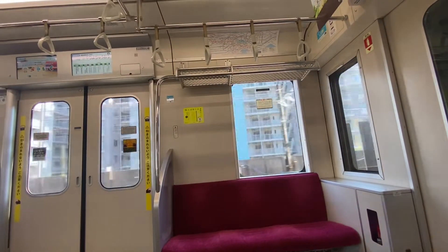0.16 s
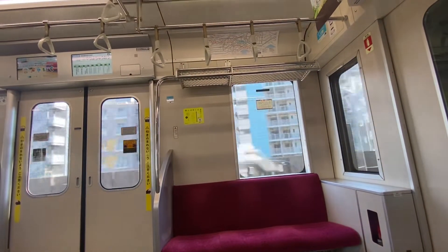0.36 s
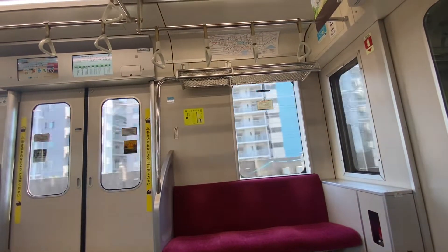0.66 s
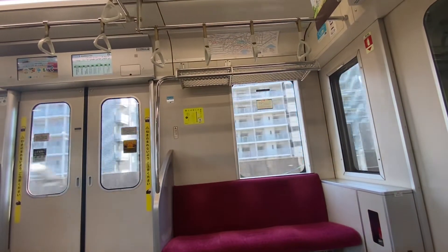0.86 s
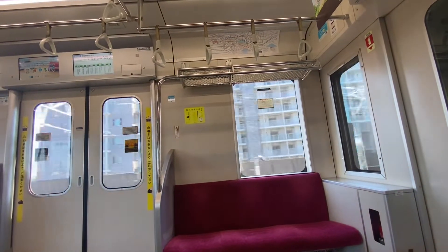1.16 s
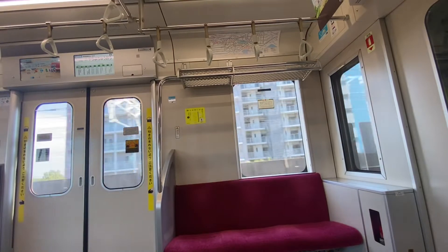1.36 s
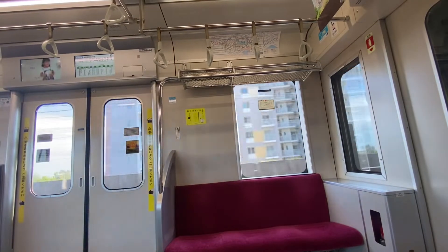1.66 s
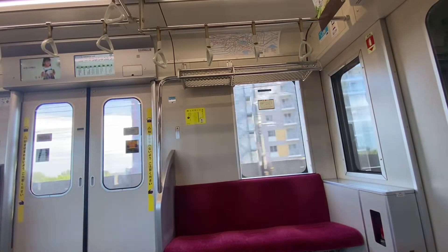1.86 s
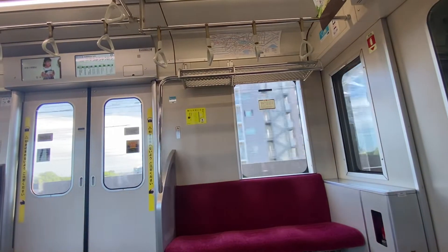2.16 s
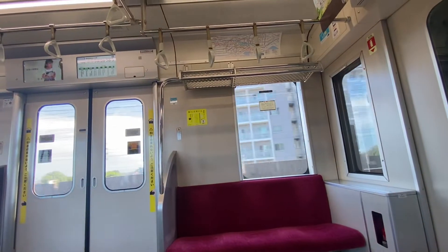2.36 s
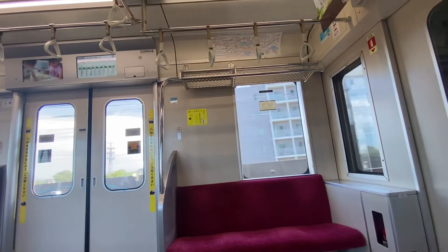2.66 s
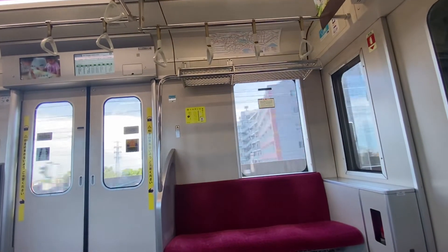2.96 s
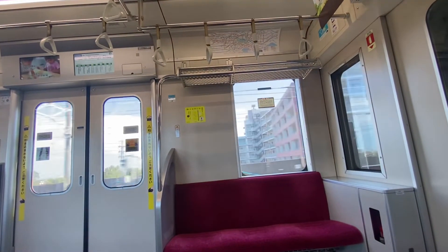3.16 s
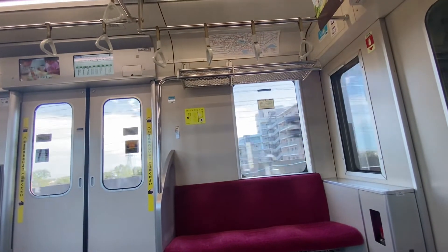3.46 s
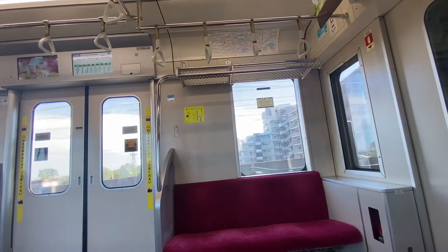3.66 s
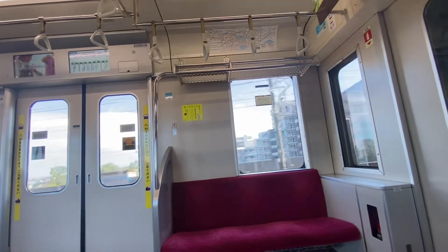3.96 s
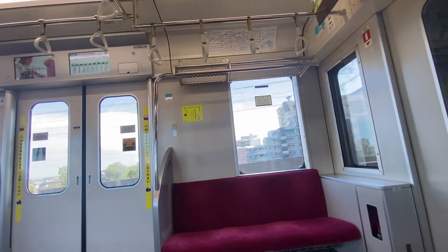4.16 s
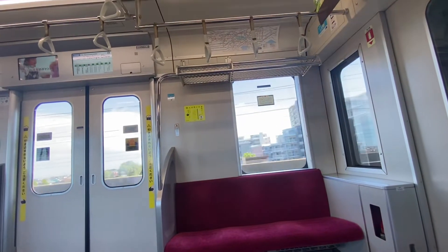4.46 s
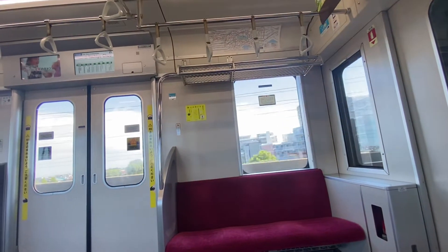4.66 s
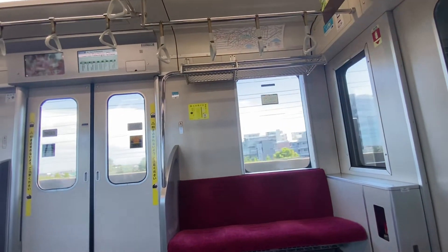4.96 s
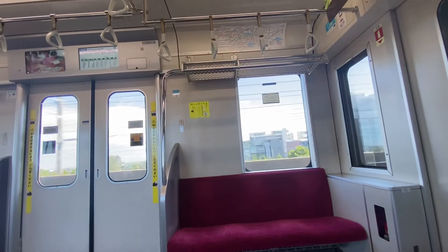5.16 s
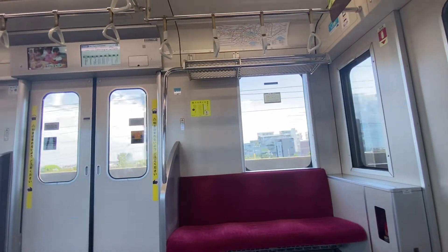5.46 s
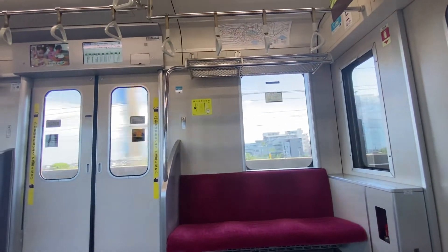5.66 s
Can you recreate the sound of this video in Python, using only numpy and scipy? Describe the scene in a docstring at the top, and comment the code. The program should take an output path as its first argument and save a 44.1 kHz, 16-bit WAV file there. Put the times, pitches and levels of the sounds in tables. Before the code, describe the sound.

Inside an electric train carriage, already moving and gathering speed for nearly six seconds. A gear and motor whine runs throughout, its main tone gliding from about 675 to 750 Hz, with a strong octave overtone, fainter higher ones and a low hum near 200 Hz. It wavers, beats and rasps in fits, roughest at the very start, and differs between left and right. Below, floor rumble and hollow drone swell and sink, thinning around 2.2 to 2.8 s and returning fuller after 4.4 s; a broad rolling roar grows slightly from 3 s. Dull rail-joint knocks, with short cabin reverberation and ringing panels, fall at 0.2 s, weakly at 1.4, then 1.9, 2.4, 2.8, strongly at 2.9, 3.3, 3.8 and 4.3, and faintly at 4.95 s. The whine is still climbing at the end.

```python
"""The gears of an electric train gathering speed whine inside its carriage: a mesh tone rises slowly, with
overtones, rasp and shaft sidebands, all locked to one shaft angle and shaped by resonances.
Floor rumble, drone and rolling roar are noise in third-octave bands that swell and sink.
Dull knocks from the joints are decaying noise bursts, and set damped sines ringing in floor and panels."""
import sys
import numpy as np
from scipy import signal
from scipy.io import wavfile

SR = 44100
rng = np.random.default_rng(int(sys.argv[2]) if len(sys.argv) > 2 else 0)


def boost(x):
    """Linear amplitude factor 10**(x/20) for a level x in decibels (scalar or array-like)."""
    u = np.asarray(x, float) / 20
    return 10 ** u


def put_to_file(sound):
    """Save the sound as 16-bit audio at rate SR, in the file named by the first command-line argument."""
    columns = np.atleast_2d(sound).T  # one column per channel
    safe = np.clip(columns, -1, 1)
    whole_steps = np.round(safe * 32767)
    wavfile.write(sys.argv[1], SR, whole_steps.astype(np.int16))


N = 255780

# Blows from the joints. Each row: start in seconds, nominal level in dB at 1800 to 3200 Hz,
# rise in dB below 900 Hz, rise in dB at 6000 Hz.
KNOCK_TIMES = [(0.1888, -41.5, 10.5, -15), (1.401, -49.5, 16.5, 1), (1.9291, -39.5, 4, -9.5),
               (2.4083, -38, 7.5, 5.5), (2.7989, -43, 9, -10), (2.9188, -34.5, 7.5, -4.5),
               (3.327, -34.5, 6, 3), (3.8322, -35, 9, -5.5), (4.2726, -35.5, 8, 1.5),
               (4.9572, -46.5, 8.5, -14)]


def rms_one(x):
    """Normalisation: the mean square is the power, so dividing by its root gives unit rms."""
    return x / np.sqrt(np.mean(np.abs(x) ** 2) + 1e-20)


def in_time(rows):
    """Linear interpolation: the columns of a time table become one value a sample."""
    s, *columns = np.transpose(rows)
    return [np.interp(np.arange(N) / SR, s, c) for c in columns]


def at_hz(points, hz):
    """Log-frequency interpolation: equal musical intervals are equal distances along a spectrum."""
    table = np.array(points)
    return np.interp(np.log(hz), np.log(table[:, 0]), table[:, 1])


def drift(rate_hz, channels=1):
    """Low-pass filtered chance: two equal poles leave a slow random curve of unit rms."""
    step, settle = 20, 4000  # computed at every 20th sample, after the filter has settled
    r = np.exp(-2 * np.pi * rate_hz * step / SR)
    white = rng.standard_normal((channels, N // step + settle + 2))
    slow = signal.lfilter([1], [1, -2 * r, r * r], white)[:, settle:]
    return np.array([np.interp(np.arange(N) / step, np.arange(len(s)), rms_one(s)) for s in slow])


def blur(width_hz):
    """Random modulation: complex noise for two sides spreads a carrier line into a band."""
    parts = drift(width_hz, channels=4)
    return (parts[:2] + 1j * parts[2:]) / np.sqrt(2)


def standing(hz):
    """Modal response: height and phase of a tone at each side sum the standing waves near its pitch."""
    # Standing waves of the carriage. Each row: frequency in Hz, width in Hz,
    # signed height at the left, signed height at the right.
    modes = [(682.97, 6.4, 0.1, -0.188), (686.15, 8.35, -0.155, -0.21), (688.74, 29.03, 0.12, 0.25),
             (693.19, 4.1, 0.069, -0.129), (695.09, 9.76, -0.204, -0.126), (700.74, 3.3, 0.025, -0.003),
             (703.2, 1.0, 0.028, 0.032), (703.53, 4.77, 0.022, -0.101), (709.92, 3.95, 0.052, -0.038),
             (711.48, 15.51, -0.08, -0.12), (713.56, 3.98, 0.024, -0.052), (718.59, 3.16, 0.05, -0.056),
             (722.64, 6.02, -0.081, -0.234), (723.84, 28.87, -0.047, 0.25), (729.0, 3.25, 0.061, -0.03),
             (732.95, 3.22, 0.083, -0.009), (735.45, 1.21, 0.016, 0.064), (738.2, 1.28, 0.004, 0.062),
             (740.6, 3.24, 0.017, 0.15), (741.67, 11.53, 0.031, -0.219), (743.93, 1.84, 0.021, -0.092),
             (744.39, 4.53, -0.008, 0.216), (746.01, 2.56, -0.018, -0.094), (749.86, 1.0, -0.007, -0.05),
             (815.55, 15.59, -0.052, 0.068)]
    centre, width, *sides = np.transpose(modes)
    detuning = 2 * (hz[::100] - centre[:, None]) / width[:, None]
    coarse = np.array(sides) @ (1 / (1 + 1j * detuning))
    return np.repeat(coarse, 100, axis=1)[:, :N]


def lifted(hz):
    """Resonance: the height of a gear line is the root of the powers of the resonances near its pitch."""
    # Each row: resonance frequency in Hz, width in Hz, height in dB.
    resonances = [(198.8, 5, -35), (204, 4, -46), (213.5, 3, -46), (657, 9, -36), (700, 60, -45.5),
                  (1351, 7, -41), (1359, 3, -41), (1367.5, 5, -39), (1375.5, 7, -35), (1384, 5, -38),
                  (1390, 4, -41), (1397, 5, -37), (1404, 7, -36.5), (1414, 8, -43), (1422, 4, -41),
                  (1430.5, 6, -38), (1443, 5, -38), (1449.5, 5, -36), (1457, 5, -36.5), (1463, 6, -37),
                  (1472, 5, -39.5), (1480, 7, -42), (1495, 6, -45), (2049, 8, -53), (2063, 8, -52),
                  (2078, 12, -51), (2095, 8, -54), (2113, 12, -53), (2138, 14, -48), (2158, 12, -47.5),
                  (2187, 30, -52), (2238, 40, -55), (2722, 20, -52), (2745, 40, -55), (2775, 26, -49.5),
                  (2801, 16, -46.5), (2850, 36, -52.5), (2905, 36, -54), (2961, 22, -45), (2988, 14, -48),
                  (3005, 14, -53), (3580, 160, -58), (6720, 280, -77), (7250, 600, -90)]
    centre, width, level_db = np.transpose(resonances)
    detuning = 2 * (hz[::100] - centre[:, None]) / width[:, None]
    power = boost(2 * level_db) @ (1 + detuning ** 2) ** -2.0
    return np.repeat(np.sqrt(power), 100)[:N]


def gears(rasp_db):
    """Gear meshing: tooth contacts lock tone, overtones and sidebands to one shaft angle; uneven teeth rasp."""
    # Train speed as gear mesh rate. Each row: time in seconds, mesh rate in Hz.
    speed = [(0.0, 675.1), (1.0, 689.1), (2.0, 702.3), (3.0, 715.1), (4.0, 727.8), (5.0, 740.7),
             (5.8, 751.3)]
    # Further gear lines, as multiples of the mesh rate.
    multiples = [2, 3, 4, .291, 9.87, 5]
    # One row for each multiple: left over right in dB, blur in dB relative to the line, blur width in Hz.
    orders = [(0, -3, 45), (1.5, -3, 50), (3.5, -3, 55), (-0.5, -8, 9), (6, -15, 30), (5, 0, 50)]
    # Phase by which the left side leads a gear line. Each row: line frequency in Hz, lead in radians.
    leads = [(200, -.4), (1350, -2.3), (1376, -2.6), (1392, -1.6), (1402, -.5), (1412, -2.6), (1422, -2.5),
             (1429, -.9), (1438, -1), (1442, -2.6), (1450, -1), (1464, -.2), (1474, -1.5), (1500, -.8),
             (2030, 1.6), (2110, 2.2), (2140, .8), (2240, 1.4), (2700, 1.6), (2800, 1.5), (2900, 1.9),
             (2960, 1.2), (6700, 0)]
    # Shaft wobble sidebands. Each row: multiple of the mesh rate, level in dB.
    sidebands = [(.860, -50), (.931, -44.5), (1.029, -48), (1.050, -46.5), (1.070, -43.5), (1.101, -48),
                 (1.139, -49), (1.860, -56), (1.880, -57), (1.912, -55), (1.931, -46), (1.949, -54),
                 (2.070, -48), (2.101, -58), (2.138, -56), (2.862, -62), (2.931, -61), (3.069, -63),
                 (3.285, -62), (3.862, -62), (1.981, -53), (2.050, -55), (3.932, -59), (4.070, -60)]
    # Sideband that the resonances lift. Each row: multiple of the mesh rate, gain over them in dB.
    lifted_sidebands = [(.949, 0)]

    mesh_hz, = in_time(speed)
    angle = 2 * np.pi * np.cumsum(mesh_hz) / SR
    carrier = np.exp(1j * angle)
    half = np.array([[.5], [-.5]])  # splits a difference between left and right

    # tooth errors shake the tone itself
    wobble = 1 + boost(-11) * blur(30) + boost(-17.5) * blur(17)
    out = standing(mesh_hz) * wobble * carrier

    fits_db = 3 * drift(7)  # the rasp comes in fits
    narrow = blur(46)
    wide = boost(-11) * blur(130) * np.exp(.06j * angle)  # leans above the tone
    out += boost(rasp_db + fits_db) * (narrow + wide) * carrier

    for multiple, (pan_db, blur_db, width_hz) in zip(multiples, orders):
        line_hz = multiple * mesh_hz
        sway = boost(2 * drift(8, channels=2))
        line = sway * np.exp(1j * half * at_hz(leads, line_hz)) + boost(blur_db) * blur(width_hz)
        out += lifted(line_hz) * boost(half * pan_db) * line * np.exp(1j * multiple * angle)

    for multiple, level_db in sidebands:
        steady = .6 * np.exp(2j * np.pi * rng.random((2, 1)))  # random phase at each side
        fading = .8 * blur(1.6)
        out += boost(level_db) * (steady + fading) * np.exp(1j * multiple * angle)

    for multiple, level_db in lifted_sidebands:
        height = boost(level_db) * lifted(multiple * mesh_hz)
        out += height * (1 + 0.47 * blur(2.6)) * np.exp(1j * multiple * angle)
    return np.sqrt(2) * out.real


def bands(spectrum):
    """Partial coherence: third-octave noise mixes a common part, late at the right, with separate parts."""
    # Each row: frequency in Hz, share of the power common to both sides.
    likeness = [(30, 0.27), (60, 0.94), (130, 0.85), (270, 0.72), (570, 0.018), (1200, 0.19), (2600, 0.066),
                (6000, 0.041)]
    # Each row: frequency in Hz, left over right in dB.
    tilt = [(60, -10), (110, -2), (190, -5), (350, -4.5), (620, 2), (1120, 0), (2010, 1), (3610, 4.5),
            (6480, 12), (11600, -13.5)]
    right_lag = 20  # samples

    bottom, top = np.clip([spectrum[0][0], spectrum[-1][0]], 16, 13000)
    edges = bottom * 2 ** np.arange(0, np.log2(top / bottom) + .2, 1 / 3)
    white = rng.standard_normal((2, 3, N + 4000))  # neighbouring bands draw on different noise
    for k, (low, high) in enumerate(zip(edges, edges[1:])):
        band_pass = signal.butter(2, [low, high], "band", fs=SR, output="sos")
        noise = signal.sosfilt(band_pass, white[k % 2])
        hz = np.sqrt(low * high)
        alike = at_hz(likeness, hz)
        common = np.array([noise[0, -N:], noise[0, -N - right_lag:-right_lag]])
        mixed = np.sqrt(alike) * common + np.sqrt(1 - alike) * noise[1:, -N:]
        sides = boost(at_hz(tilt, hz) * np.array([[.5], [-.5]]))
        yield hz, boost(at_hz(spectrum, hz)) * sides * mixed


def rolling(spectrum, level_db, patchy_db, patch_hz, treble_db=0):
    """Band-wise modulation: each noise band swells and sinks on its own; treble_db acts above 4000 Hz."""
    total = 0
    for hz, band in bands(spectrum):
        total = total + band * boost(patchy_db * drift(patch_hz) + treble_db * (hz > 4000))
    return boost(level_db) * rms_one(total)


def rumble(level_db):
    """Broadband noise: the lowest part of the floor's sound, in slow patches."""
    # Each row: frequency in Hz, relative density in dB per Hz.
    spectrum = [(12, -47.5), (20, -31), (43, 2), (102, 0.5), (130, -1), (170, -26), (290, -120)]
    return rolling(spectrum, level_db, patchy_db=1.5, patch_hz=1.8)


def drone(level_db):
    """Coloured noise: peaks in the spectrum give the low drone its hollow colour."""
    # Each row: frequency in Hz, relative density in dB per Hz.
    spectrum = [(53, -20), (90, -10.5), (140, -6), (167, 6), (193, -6.5), (207, -1), (231, -8), (275, -0.5),
                (328, -8.5), (419, -12.5), (466, -19), (560, -13.5), (730, -37), (1230, -120)]
    return rolling(spectrum, level_db, patchy_db=3.5, patch_hz=3.1)


def roar(level_db):
    """Coloured noise: the rolling roar has faster patches and a treble share that varies in time."""
    # Each row: frequency in Hz, relative density in dB per Hz.
    spectrum = [(400, -12.5), (560, -5.5), (900, 5), (1200, -4), (1500, -2), (1800, -9.5), (2100, -7),
                (2500, -11.5), (3000, -11), (3600, -22), (5000, -27.5), (6300, -38.5), (7300, -63),
                (8000, -56), (8700, -46), (9400, -57), (10500, -45.5), (12500, -51)]
    # Each row: time in seconds, treble above or below its usual share in dB.
    treble = [(0.0, 3.5), (0.8, 0), (1.6, 0.7), (2.3, 2), (3.0, -3.5), (3.7, -2), (4.5, -1.5), (5.2, 0.5),
              (5.8, -2)]
    return rolling(spectrum, level_db, patchy_db=2.1, patch_hz=9, treble_db=in_time(treble)[0])


def blow_db(hz):
    """Spectral tilt: the nominal strength of every knock at one frequency follows its low and top parts."""
    strengths = []
    for _, level_db, low_db, top_db in KNOCK_TIMES:
        shape = [(900, low_db), (1800, 0), (3200, 0), (6000, top_db), (14000, top_db + min(top_db, 0))]
        strengths.append(level_db + at_hz(shape, hz))
    return strengths


def knocks():
    """Reverberant decay: a lumpy burst holds, then dies band by band; a crack and rebound sharpen its treble."""
    # Each row: frequency in Hz, relative density in dB per Hz before the tilt of each blow.
    spectrum = [(250, 5.5), (400, 6), (600, 6), (900, 9), (1300, 8.5), (2100, 6), (3500, -3), (6200, -16),
                (8000, -48), (8700, -35.5), (9400, -49), (10500, -36.5), (12500, -33)]
    # Each row: frequency in Hz, time in seconds in which the carriage's sound decays by 60 dB.
    carriage = [(300, 0.26), (1000, 0.3), (3000, 0.28), (6000, 0.53), (12000, 0.3)]
    hold_s = 0.022
    crack_db, crack_s = 4, 0.004  # over the burst; decay constant
    rebound_db, rebound_s = -5, 0.029  # relative to the crack; delay

    age = np.arange(SR // 2) / SR
    crack = np.exp(-age / crack_s)
    rebound = boost(rebound_db) * (age > rebound_s) * np.exp(-abs(age - rebound_s) / crack_s)
    # several contacts and early echoes
    lumps = boost(1.3 * drift(70, channels=2) + 1.3 * drift(90))
    out, power = 0, 0
    for hz, band in bands(spectrum):
        bright = hz > 1800
        decay = boost(-60 * np.maximum(age - hold_s, 0) / at_hz(carriage, hz))
        decay = decay + boost(crack_db) * bright * (crack + rebound)
        rise = 1 - np.exp(-age / (0.001 + 3 / hz))  # lows rise more slowly
        envelope = np.zeros(N + len(age))
        for (s, *_), level_db in zip(KNOCK_TIMES, blow_db(hz)):
            envelope[int(s * SR):][:len(age)] += boost(level_db + rng.normal(0, 1.5)) * rise * decay
        out = out + band * envelope[:N]
        power += np.mean(band ** 2) * bright  # blows are sized by their bright part
    return lumps * out / np.sqrt(power)


def ring(clicks, hz, t60):
    """Damped oscillator: a unit click sets off a sine of initial height 1 that falls 60 dB in t60 seconds."""
    r, w = boost(-60 / (t60 * SR)), 2 * np.pi * hz / SR
    return signal.lfilter([0, np.sin(w)], [1, -2 * r * np.cos(w), r * r], clicks + 1e-18)


def panels():
    """Modal excitation: each knock strikes every mode a little late, with its own strength on each side."""
    # Modes of floor and panels. Each row: frequency in Hz, relative level in dB, 60 dB decay time in seconds.
    modes = [(385, -11, .2), (450, -12, .2), (550, -7, .2), (613, -2, .3), (715, -2, .2), (868, -6, .2),
             (1010, -9, .18), (1640, -9, .18), (1930, -9, .18), (2050, -9, .18), (2433, -8, .2),
             (2700, -9, .18), (3381, -15, .2), (4230, -20, .18), (5150, -23, .2), (6012, -25, .25)]
    ringing_db, contact_s = 5, 0.03  # gain of all modes; 60 dB decay time of the soft contact

    out, at = 0, np.array(KNOCK_TIMES)[:, 0]
    for hz, level_db, t60 in modes:
        clicks = np.zeros((2, N))
        late = ((at + rng.uniform(.001, .025, (2, len(at)))) * SR).astype(int)
        chance_db = rng.normal(0, 4.5, (2, len(at)))
        strength = boost(np.array(blow_db(hz)) + level_db + ringing_db + chance_db)
        np.put_along_axis(clicks, late, strength, axis=1)
        # a soft contact swells over some milliseconds
        contact = ring(clicks, hz, contact_s) * 2 * np.log(1000) / (contact_s * SR)
        out = out + ring(contact, hz, t60)
    return out


def scene():
    """Superposition: the pressures of gears, rolling noise, knocks and ringing panels add."""
    # Each row: time in seconds, then rumble, drone, roar and gear rasp levels in dB.
    levels = [(0.0, -34.5, -30, -38, -28.5), (0.3, -37.5, -29, -37, -44.5), (0.75, -39, -32, -36, -38),
              (1.65, -37.5, -32, -36.5, -39), (1.98, -41, -36.5, -36.5, -43.5),
              (2.15, -40, -42.5, -35.5, -30), (2.33, -50.5, -39.5, -35.5, -41.5),
              (2.6, -47.5, -38.5, -36, -32.5), (3.0, -43, -35, -33, -36.5), (3.22, -42.5, -30, -32.5, -31),
              (3.5, -39.5, -30, -33, -39), (4.1, -42.5, -34.5, -34, -34), (4.45, -30.5, -31, -33.5, -40),
              (4.85, -35.5, -33.5, -34, -35), (5.25, -33.5, -26.5, -33.5, -29),
              (5.8, -33.5, -34, -33.5, -39.5)]
    rumble_db, drone_db, roar_db, rasp_db = in_time(levels)
    noise = rumble(rumble_db) + drone(drone_db) + roar(roar_db)
    return gears(rasp_db) + noise + knocks() + panels()


def band_limit(x):
    """A steep low-pass at the top of the band."""
    return signal.sosfilt(signal.butter(12, 12240, fs=SR, output="sos"), x)


def record(dry):
    """Signal chain: the summed sound passes through one last stage, which roughens it and cuts the treble."""
    return band_limit(dry)


dry = scene()
out = record(dry)
put_to_file(out)
```